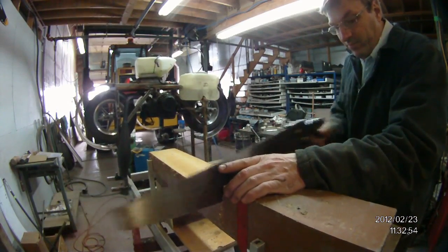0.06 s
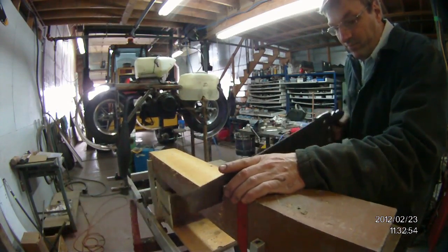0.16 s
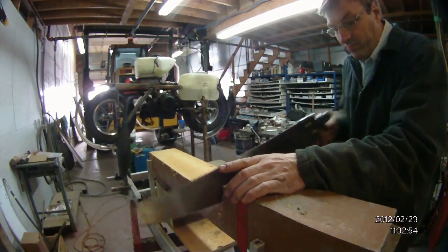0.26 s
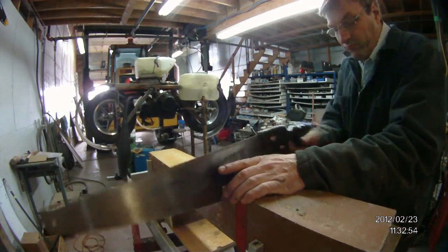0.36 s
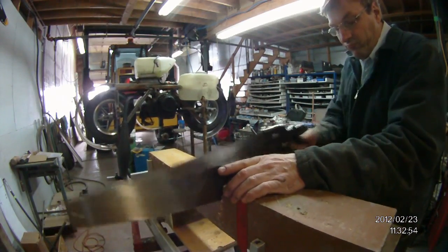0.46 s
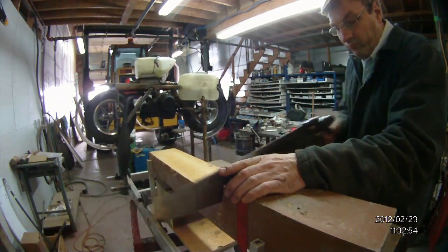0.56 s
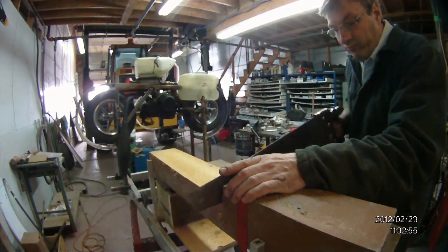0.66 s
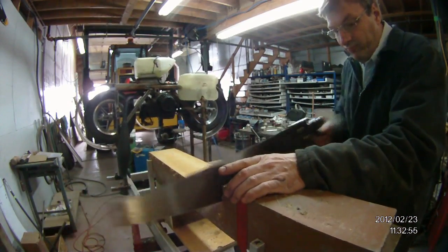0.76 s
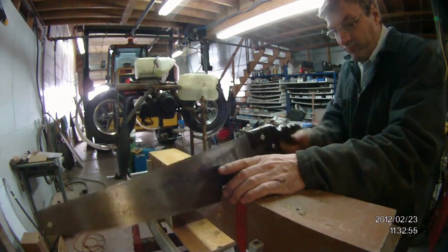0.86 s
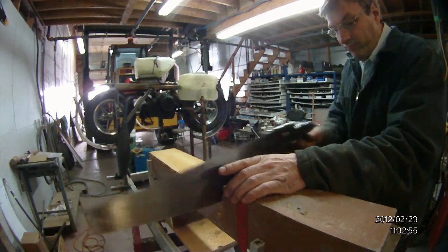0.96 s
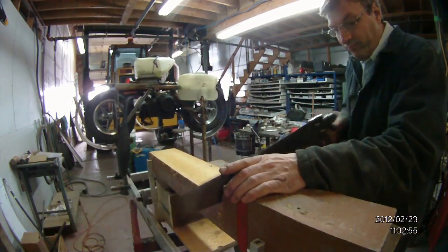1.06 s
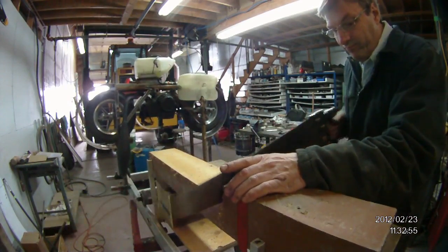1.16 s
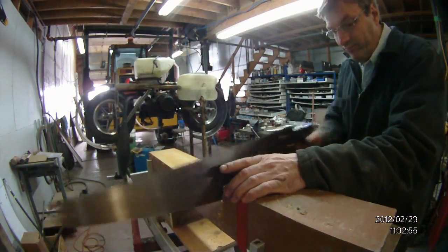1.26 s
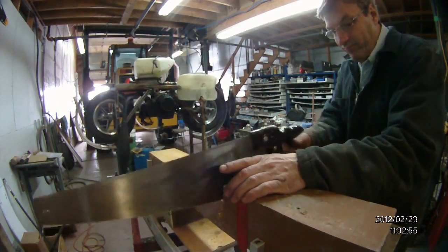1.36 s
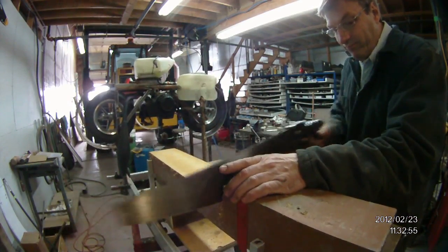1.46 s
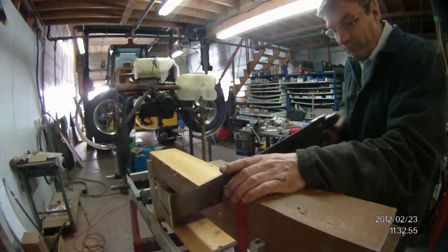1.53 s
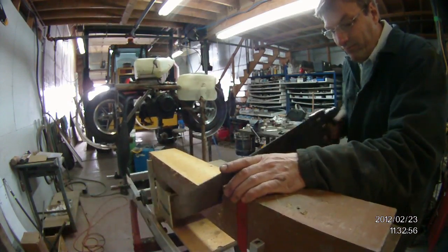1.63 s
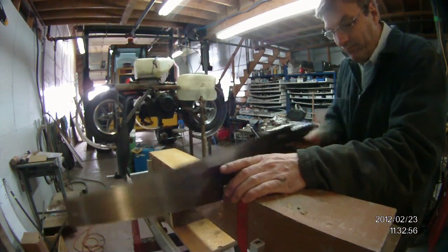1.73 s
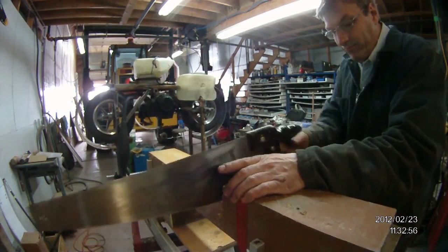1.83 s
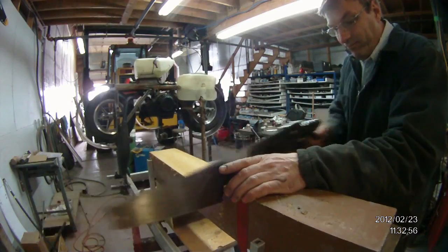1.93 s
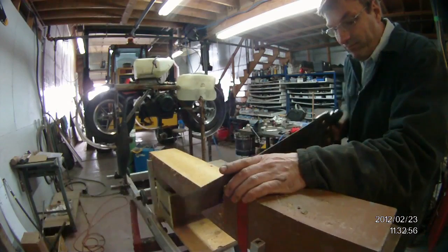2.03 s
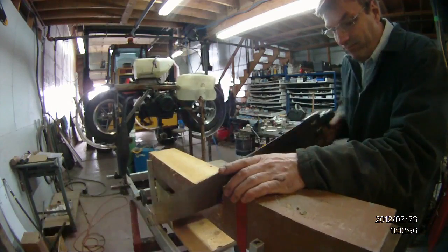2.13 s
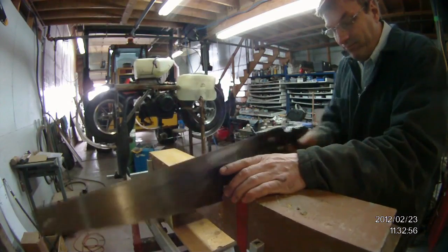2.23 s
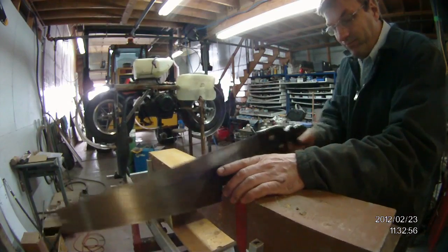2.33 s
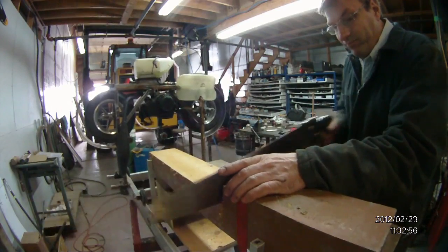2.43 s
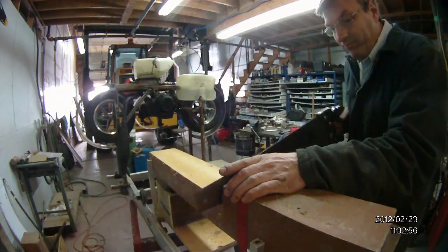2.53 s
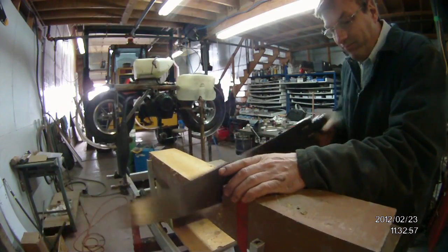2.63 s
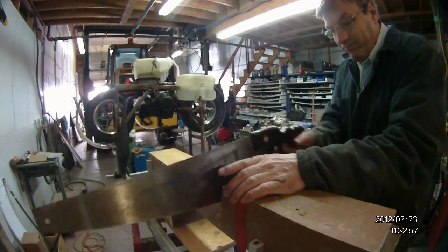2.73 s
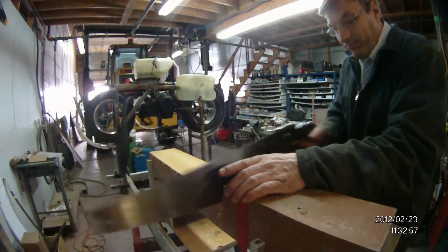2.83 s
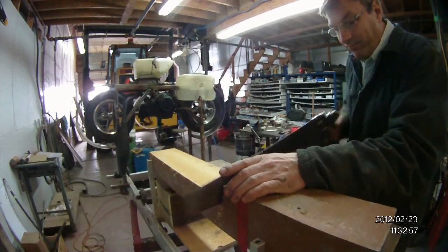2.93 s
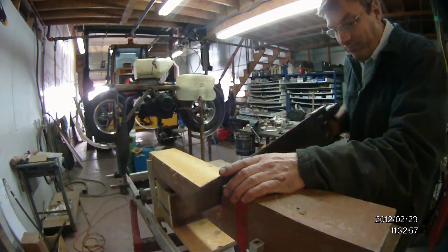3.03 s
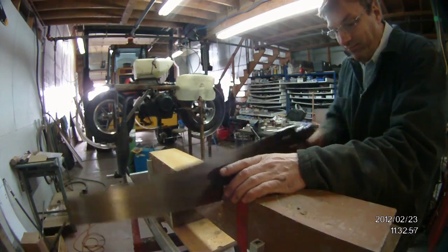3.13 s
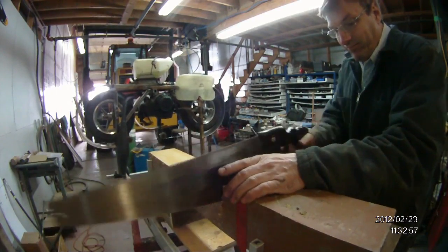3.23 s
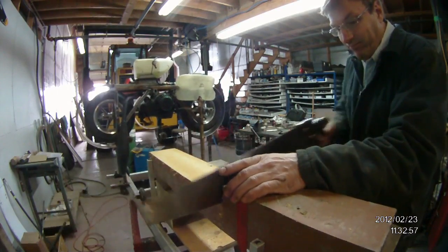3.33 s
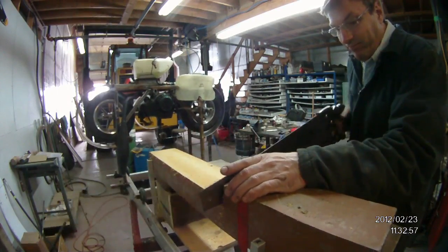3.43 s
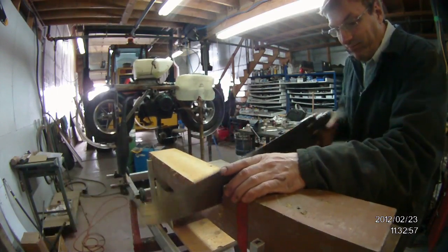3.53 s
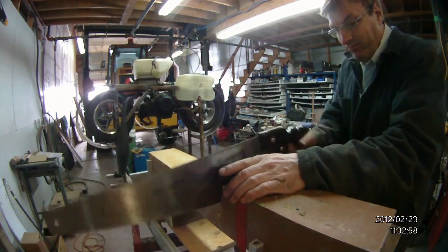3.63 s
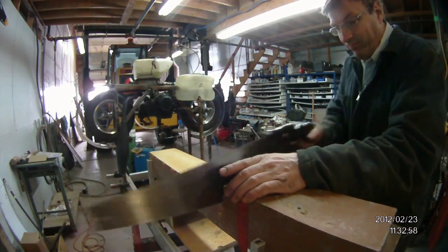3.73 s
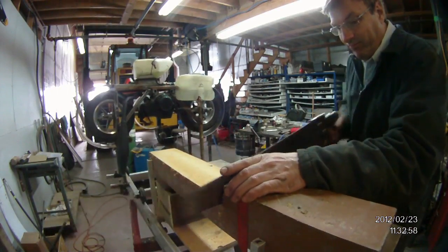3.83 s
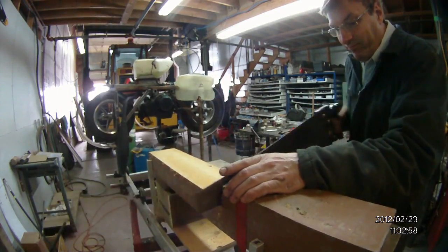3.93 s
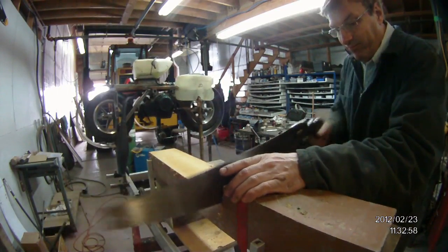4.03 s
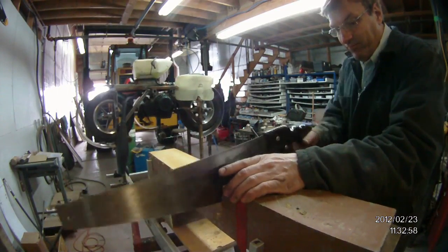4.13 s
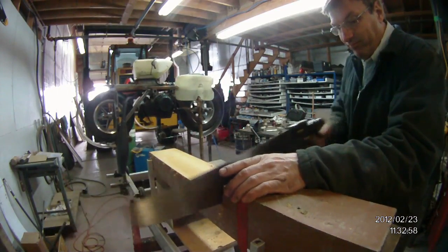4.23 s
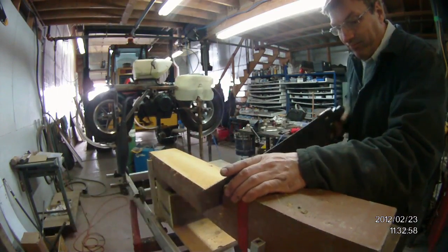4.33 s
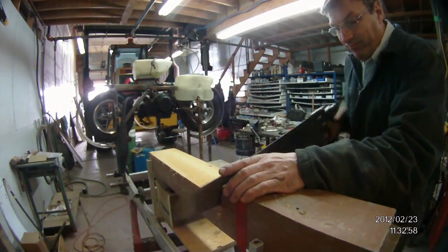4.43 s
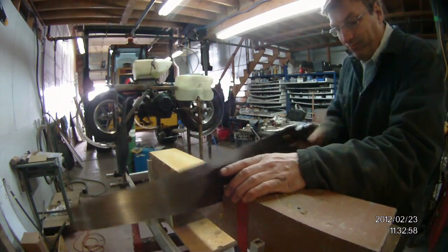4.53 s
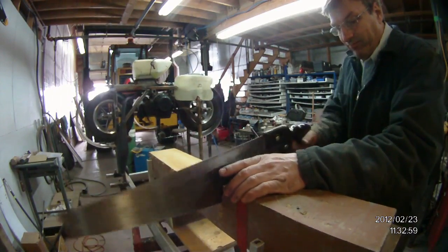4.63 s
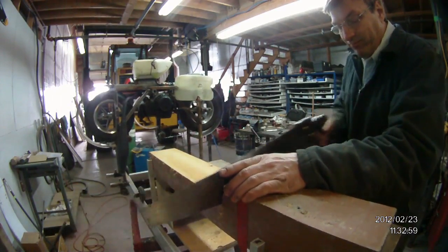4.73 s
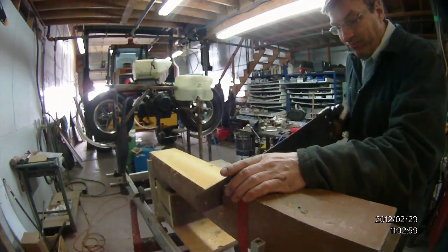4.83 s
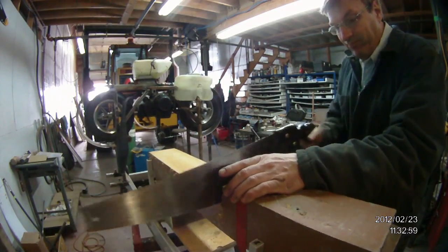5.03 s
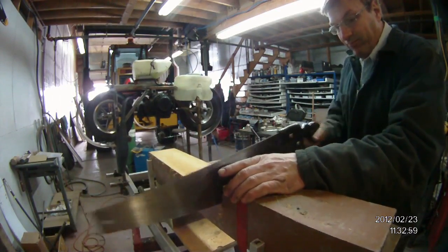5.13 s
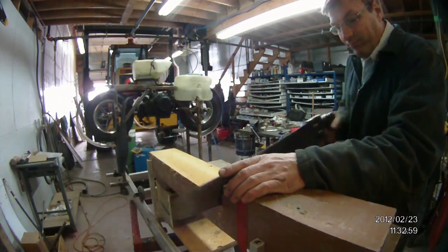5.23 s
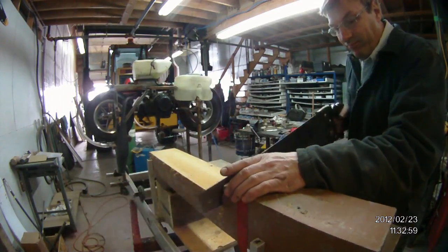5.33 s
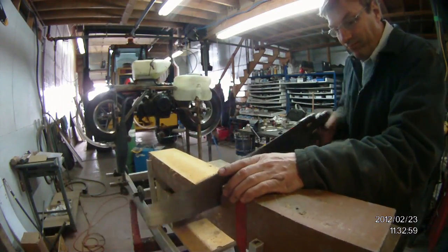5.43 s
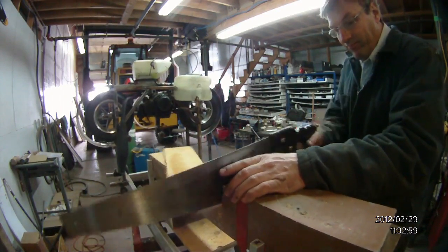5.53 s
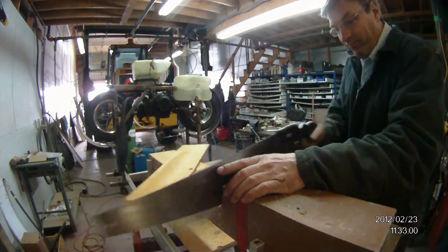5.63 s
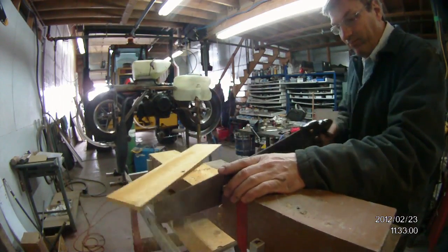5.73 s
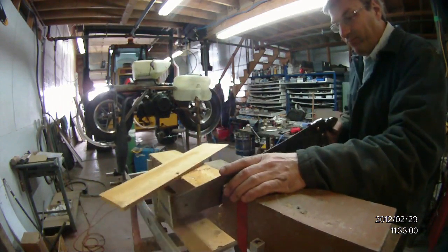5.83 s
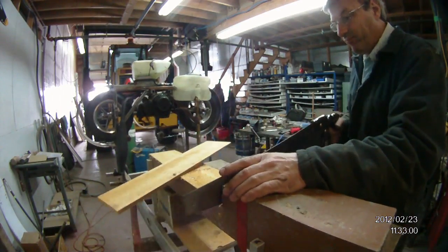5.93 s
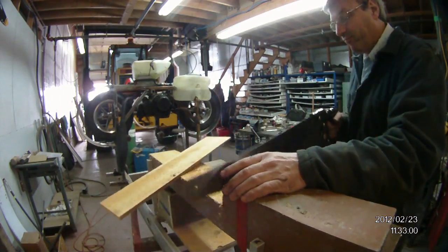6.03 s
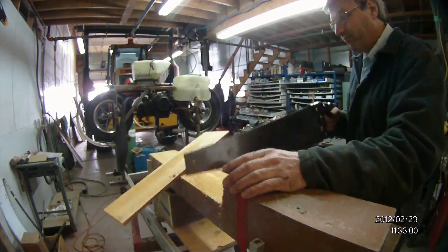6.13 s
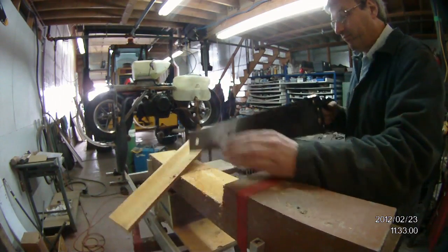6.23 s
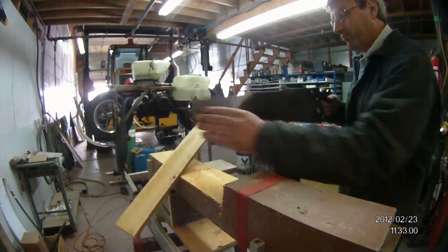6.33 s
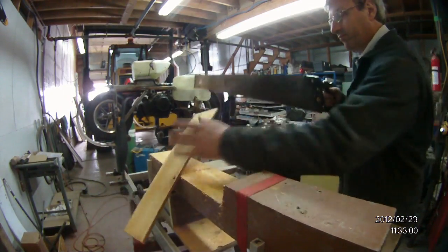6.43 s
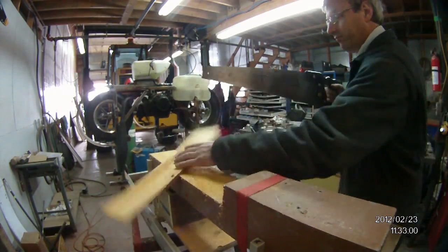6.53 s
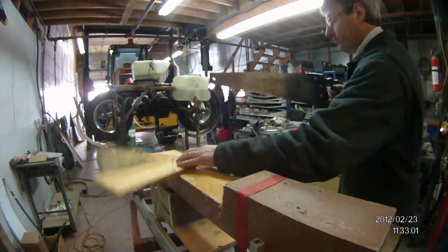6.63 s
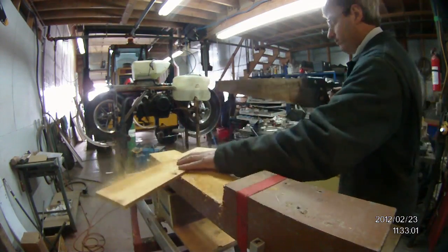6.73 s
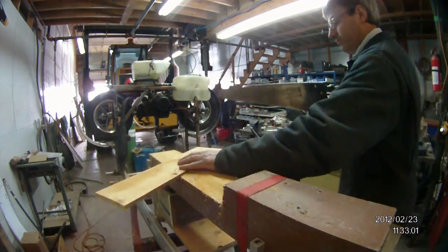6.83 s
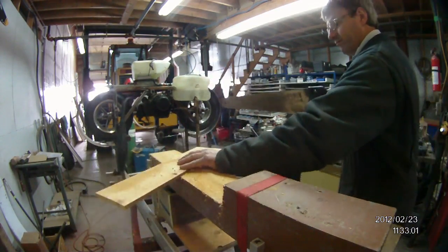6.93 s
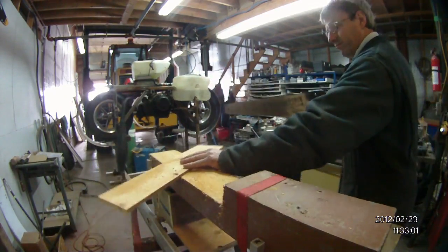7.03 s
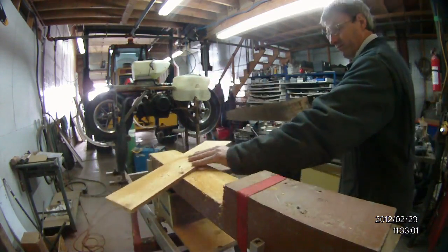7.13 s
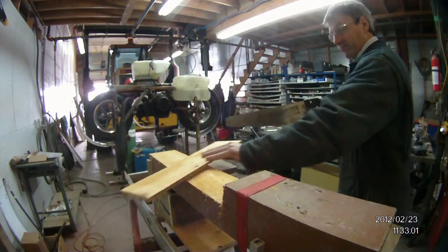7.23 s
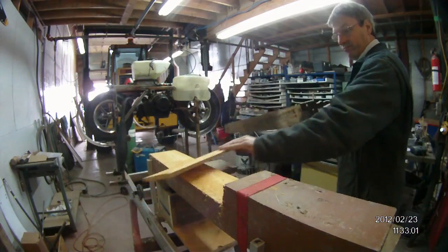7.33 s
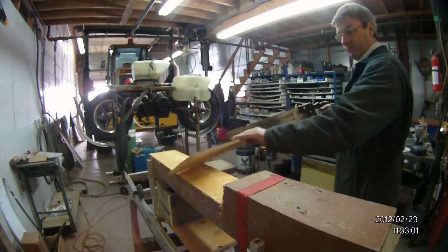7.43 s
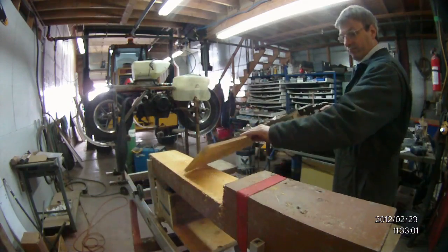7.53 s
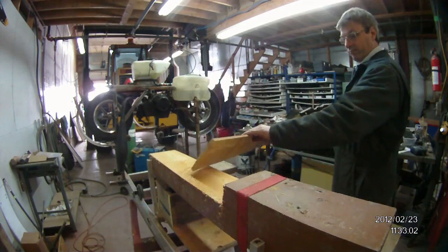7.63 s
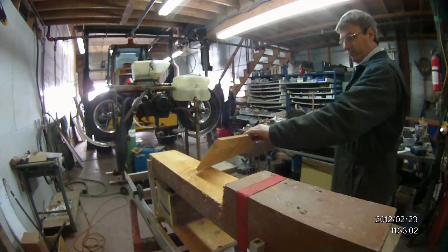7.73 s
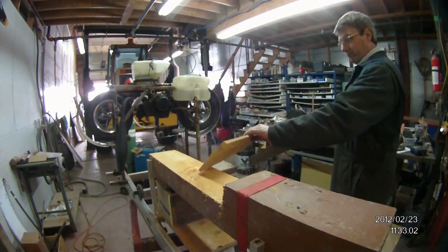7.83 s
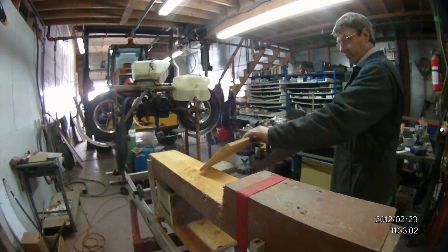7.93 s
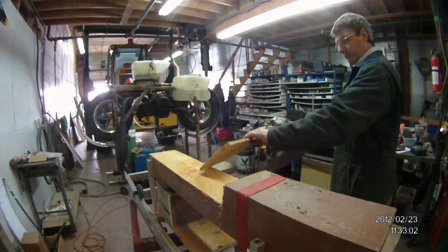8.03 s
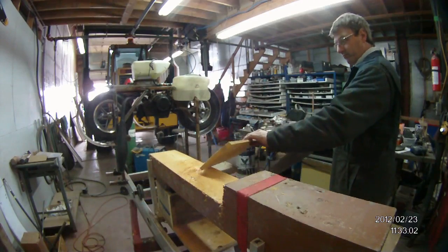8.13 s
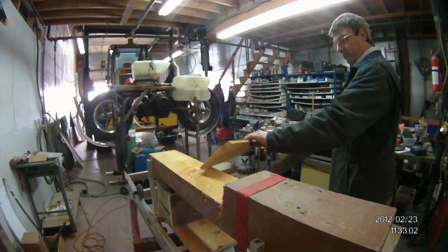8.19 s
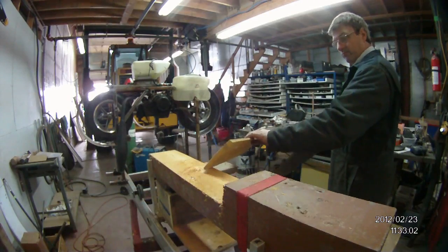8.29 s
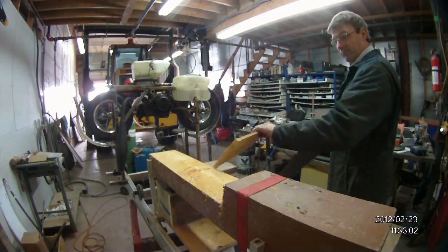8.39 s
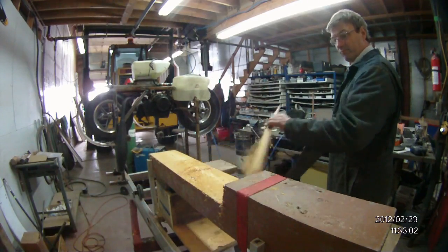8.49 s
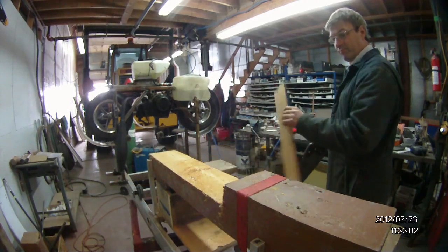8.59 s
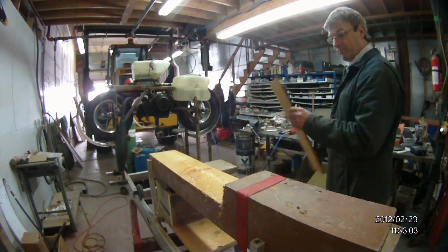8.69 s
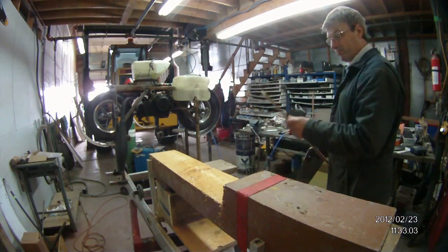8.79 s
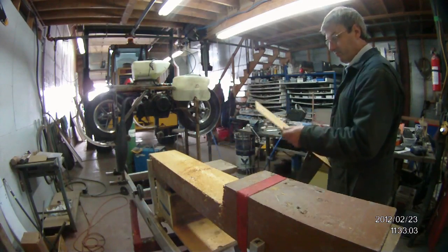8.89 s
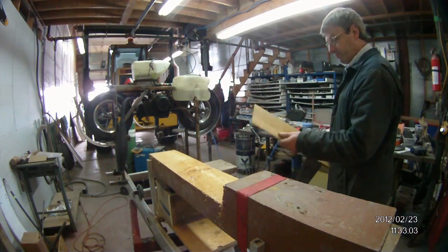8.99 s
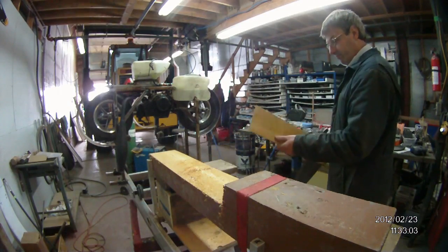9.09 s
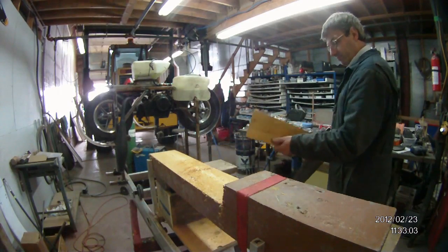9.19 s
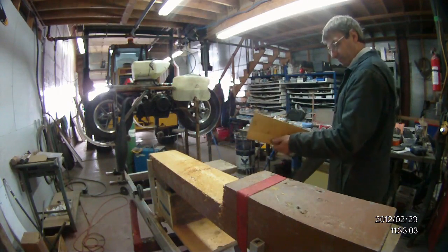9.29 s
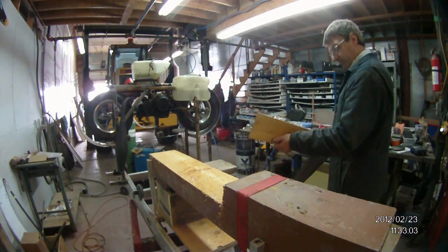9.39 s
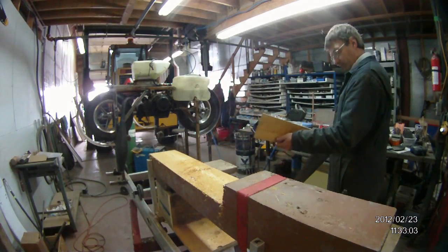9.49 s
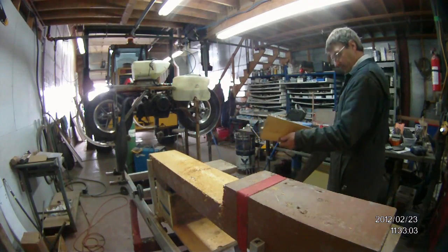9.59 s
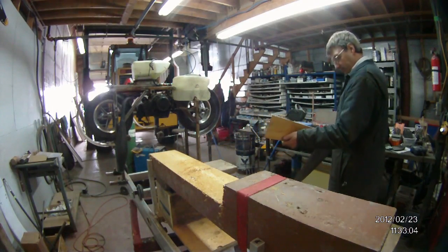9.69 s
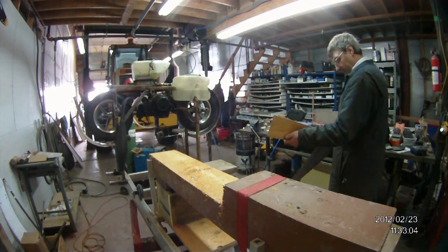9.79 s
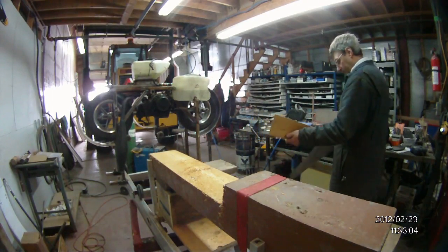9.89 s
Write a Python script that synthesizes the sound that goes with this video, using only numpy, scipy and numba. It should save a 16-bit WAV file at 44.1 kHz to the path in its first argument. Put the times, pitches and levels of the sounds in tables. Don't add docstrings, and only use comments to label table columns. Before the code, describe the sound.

A steady, gritty sawing rhythm with a hollow wood and steel resonance fills the first half, without pauses, and chirps once as the cut closes. After it stops, a few light knocks, a rub and a short swipe follow. Beneath everything a tiny geared mechanism ticks and whirs rapidly, close and dry, while the sawing carries a short dull indoor reverberation. The small microphone sounds slightly boxy.

```python
import sys
import numpy as np
from scipy import signal
from scipy.fft import rfft, irfft, next_fast_len
from scipy.io import wavfile
from scipy.ndimage import uniform_filter1d
from numba import njit

SR = 44100
rng = np.random.default_rng(int(sys.argv[2]) if len(sys.argv) > 2 else 0)


def output_pcm(signal):
    pcm = np.clip(np.atleast_2d(signal).T, -1, 1) * 32767
    wavfile.write(sys.argv[1], SR, np.round(pcm).astype(np.int16))


def volts_from_db(level):
    exponent = np.asarray(level, float) / 20
    return 10 ** exponent


N = 438794
T = np.arange(N) / SR
FAST = next_fast_len(N)
HZ = np.fft.rfftfreq(FAST, 1 / SR)
TURN_HZ, BUMP_S = 19.94, 8.035

# frequency in Hz, rms level in dB.
HUM = [(40, -106), (60, -101), (120, -92.5), (240, -89), (290, -91.5)]
# frequency in Hz, rms level in dB.
WHINE = [(360.3, -74), (1276, -75.5), (1403, -77.5), (2272, -76.5), (7838, -79.5), (7897, -88)]
# frequency in Hz, level in dB per Hz.
CLATTER_SLOPE = [(30, -40), (85, -42), (200, -20), (325, -30.5), (380, -6.5), (630, -11), (840, -9.5),
                 (1420, -4), (1890, -14.5), (2300, -11), (6000, -13), (6700, -21.5), (9500, -28),
                 (15300, -39)]
# frequency in Hz, width in Hz, level in dB.
CASING_MODES = [(357, 19, -5), (1410, 42, -8), (2340, 10, -10), (2510, 23, -14), (2720, 120, -6),
                (3980, 53, -2), (4360, 170, -1), (5240, 19, -20), (5850, 18, 6), (5770, 43, -25)]
# share of a turn, level in dB.
GEAR_TEETH = [
    (.03, -5),
    (.13, 0),
    (.52, -10.5),
    (.72, -7.5),
]
# frequency in Hz, level in dB, 60 dB decay time in seconds.
TICK_MODES = [(480, -7, .08), (640, -8, .08), (970, -8, .07), (3150, -9, .06), (3880, 2, .04),
              (4330, -14, .05), (5340, 1, .035), (5950, -4, .035)]
# peak in seconds, peak level in dB, swell and fade in dB per second.
RUBS = [
    (5.9, -71, 90, 15),
    (6.65, -68, 140, 36),
    (7.4, -63, 51, 21),
    (7.63, -79, 90, 60),
    (8.53, -62, 170, 230),
]
# frequency in Hz, level in dB per Hz.
CLOTH_SLOPE = [(200, -10), (600, -12), (1400, 12.5), (1900, -1.5), (3600, 4.5), (5000, -0.5), (8000, -29),
               (15000, -41)]
# start in seconds, peak level in dB, ring in Hz,
# 60 dB decay time in seconds, crack level in dB.
TAPS = [(1.727, -48, 1470, .04, -2), (2.159, -39, 1470, 0.064, -14), (5.463, -45, 1396, .14, 1),
        (5.525, -40, 1410, 0.11, -10), (5.736, -56, 290, 0.22, -30), (6.596, -48.5, 1340, .06, -2),
        (6.597, -60.5, 250, .07, -20), (6.604, -49, 1330, .1, -5), (6.684, -61, 1500, .05, 8.5),
        (6.713, -51, 800, .08, -10), (6.722, -48, 1300, 0.12, -20), (6.737, -53, 1090, 0.14, -12),
        (7.282, -62, 3800, .07, -6), (7.335, -62, 1417, .2, 4), (7.612, -58, 3650, .08, -6)]
# frequency in Hz, level in dB per Hz.
TEAR_SLOPE = [(120, -48.5), (280, -19), (460, -17), (820, -14.5), (980, -4.5), (1450, 0), (1740, -14),
              (2030, -10), (2930, -7), (4100, -2.5), (4750, -6.5), (5600, -15.5), (9300, -27.5),
              (15300, -59.5)]
# frequency in Hz, width in Hz, level in dB.
BLADE_MODES = [(457, 58, 19), (987, 11.3, -4), (1420, 66, 8), (2053, 33, -14), (2500, 590, -19),
               (4405, 240, -11)]
# mid-stroke frequency in Hz, width in Hz, level in dB,
# glide over a stroke as a share of the frequency.
BENDING_MODES = [(644, 21, -17, 0.17), (1000, 32, -7.5, 0.045), (1200, 28, -2, 0.16),
                 (1426, 31, -1.5, 0.029), (2045, 110, -7, 0.074), (2475, 120, -7, 0.083),
                 (3150, 120, -4, 0.043), (3930, 90, -6.5, 0.044), (4236, 160, -0.5, 0.046),
                 (4587, 99, 0.5, .03)]
# start in seconds, top tooth rate in Hz,
# lateness of top speed, tooth tone in dB, peak level in dB.
PUSH_STROKES = [(-.15, 900, 1.0, -14, -40.5), (.308, 699.5, 1.0, -15, -40), (.789, 924.8, 1.5, -15, -41.5),
                (1.249, 1015, 1.3, -17, -41), (1.713, 1015, 1.2, -15.5, -41),
                (2.195, 1030, 1.4, -10.5, -38.3), (2.664, 1015, 1.2, -12, -38),
                (3.117, 1045, .8, -8.5, -41.5), (3.57, 1060, 1.4, -15.5, -40.5),
                (4.034, 744, 1.2, -28, -41), (4.5, 940, 1.5, -7, -38.5), (4.983, 748.6, 1.4, -12, -41.5),
                (5.448, 783.6, 1.1, -10.5, -42.5), (6.02, 450, 1.0, -7, -60)]
# start in seconds, top tooth rate in Hz,
# lateness of top speed, tooth tone in dB, peak level in dB.
PULL_STROKES = [(.084, 770, 1.3, -18, -46), (.561, 715, 1.0, -17, -46.5), (1.025, 761, 1.0, -13, -47),
                (1.483, 795, 1.2, -8, -46), (1.96, 810.9, .7, -13, -45), (2.42, 714.8, .9, -22, -45),
                (2.897, 611.8, .9, -19, -45.5), (3.346, 627.5, 1.2, -18, -46.5),
                (3.804, 604.3, 1.0, -17, -46), (4.278, 569, 1.0, -14.5, -46.5),
                (4.751, 758.6, 1.2, -9, -45), (5.238, 500, 1.3, -30, -47.5), (5.705, 450, .4, -28, -46.5)]
PUSH_FORCE = [(0, 0.1), (.1, 0.2), (.2, 0.77), (.32, 0.92), (.55, 1.01), (.72, 0.9), (.85, 0.44), (1, 0)]
PULL_FORCE = [(0, .18), (.1, 0.9), (.22, 0.96), (.45, 1), (.65, 1), (.8, 0.6), (.9, 0.21), (1, .02)]
# middle in seconds, half length in seconds, change in dB.
SLACK_MOMENTS = [(0.113, 0.036, -2), (0.52, 0.03, -6), (0.582, 0.029, -2.5), (1.755, .025, -2.5),
                 (4.24, 0.037, -3), (4.7, 0.037, -3.5), (4.823, 0.018, -3), (4.927, 0.026, -2),
                 (5.18, 0.027, -3), (5.257, 0.042, -5), (5.444, 0.016, -7), (5.495, .025, -4.5)]


def unit(x):
    return x / np.sqrt(np.mean(x ** 2))


def decay(t, t60):
    return np.exp(-np.log(1000) * t / t60)


def bell(x, middle, half_width):
    return np.exp(-((x - middle) / half_width) ** 2)


def colour(x, points, peaks=(), lift_db=0.):
    size = 2 ** 14
    grid = np.fft.rfftfreq(size, 1 / SR)
    hz, db = np.transpose(points)
    gain_db = np.interp(np.log(grid + 1), np.log(hz), db)
    for f, width, peak_db in peaks:
        gain_db = gain_db + (lift_db + 0.044 * peak_db) / (1 + ((grid - f) / (width / 2)) ** 2)
    cepstrum = irfft(gain_db * np.log(10) / 20, size)
    cepstrum[1:size // 2] *= 2
    cepstrum[size // 2 + 1:] = 0
    response = irfft(np.exp(rfft(cepstrum)), size)[:size // 4]
    return signal.oaconvolve(x, response)[:N]


def band(x, lo_hz, hi_hz):
    return signal.sosfiltfilt(signal.butter(2, [lo_hz, hi_hz], "band", fs=SR, output="sos"), x)


def walk(rate):
    hold = int(SR / rate)
    levels = np.repeat(rng.standard_normal(N // hold + 1), hold)
    return 1.21 * uniform_filter1d(levels, hold)[:N]


def grit(spread_db):
    return unit(rng.standard_normal(N) * volts_from_db(spread_db * rng.exponential(size=N)))


def tones():
    lines = list(HUM) + list(WHINE)
    starts = rng.random(len(lines))
    out = np.zeros(N)
    for (hz, db), start in zip(lines, starts):
        out += volts_from_db(db + 2.5 + 0.6 * walk(3.8)) * np.sin(2 * np.pi * (hz * T + start))
    return out


def motor(memory=0.895, fresh_db=-11.5, motor_db=-62.5):
    turn = ((T - BUMP_S) * TURN_HZ) % 1
    echo = 1 / (1 - memory * np.exp(-2j * np.pi * HZ / TURN_HZ))
    repeated = unit(irfft(rfft(grit(0.96), FAST) * echo, FAST)[:N])
    clatter = repeated + volts_from_db(fresh_db) * rng.standard_normal(N)
    clatter = unit(colour(clatter, CLATTER_SLOPE, CASING_MODES, lift_db=4.0))
    bump = uniform_filter1d(np.minimum(turn / 0.063, 1) * np.exp(-turn / 0.4), 250)
    low = band(clatter, 490, 810)
    treble = band(clatter, 2150, 8100)
    air = band(clatter, 7800, 15000)
    lag = 1 + 0.19 * np.cos(2 * np.pi * (turn - .65))
    flares = low * unit(bump + 0.46) + treble * unit(bump + 0.82) + air * unit(bump + 0.46)
    return volts_from_db(motor_db) * ((clatter - low - treble - air) * lag + flares)


def gear(glide_per_s=4.9):
    turns = np.arange(-161, 39)[:, None]
    place, db = np.transpose(GEAR_TEETH)
    chance = rng.standard_normal((len(turns), len(place), 2))
    at = ((BUMP_S + (turns + place) / TURN_HZ) * SR + chance[..., 0]).astype(int)
    inside = (at >= 0) & (at < N)
    hits = np.bincount(at[inside], volts_from_db(db + chance[..., 1])[inside], N)
    t = T[:2500]
    cycles = .97 * t + glide_per_s * t ** 2 / 2
    ring = sum(volts_from_db(db) * np.sin(2 * np.pi * hz * cycles) * decay(t, t60) for hz, db, t60 in TICK_MODES)
    ring = ring * (1 - np.exp(-t / .002))
    return volts_from_db(-68.5) * unit(signal.oaconvolve(hits, ring)[:N])


def rustle():
    swells = np.zeros(N)
    for s, db, up, down in RUBS:
        swells += volts_from_db(db - np.where(T < s, up * (s - T), down * (T - s)))
    peaks = [(3620, 130, 0), (4620, 350, 0), (2280, 87, 0)]  # Hz, width Hz, dB
    return unit(colour(grit(2.1), CLOTH_SLOPE, peaks, lift_db=6.5)) * swells * volts_from_db(1.4 * walk(30))


def knocks():
    out, t = np.zeros(N), T[:6000]
    chance = rng.standard_normal((len(TAPS), len(t)))
    for (s, db, hz, t60, crack_db), noise in zip(TAPS, chance):
        ring = .5 * np.sin(2 * np.pi * hz * t)
        ring = ring + 0.4 * unit(band(noise, .5 * hz, 1.3 * hz))
        ring = ring + 0.061 * unit(band(noise, 280, 550))
        ring = ring * decay(t, t60) * np.minimum(t / 0.0012, 1)
        snap = 0.74 * np.exp(-t / 0.0023) + 0.41 * np.exp(-t / 0.014)
        crack = volts_from_db(crack_db) * unit(band(noise, 2100, 5600)) * snap * np.minimum(t / .0005, 1)
        at = int(s * SR)
        out[at:at + len(t)] += volts_from_db(db) * (ring + crack)
    return signal.sosfilt(signal.butter(4, 200, "high", fs=SR, output="sos"), out)


def squeal():
    start_s, length_s, from_hz, to_hz, song_db = 5.045, .17, 1130, 1490, -40
    groan_hz, groan_db = 450, -52
    t = T[:int(length_s * SR)]
    share = t / t[-1]
    rough = uniform_filter1d(rng.standard_normal((2, len(t))), size=300) * np.sqrt(300)
    hz = from_hz + (to_hz - from_hz) * np.sin(np.pi * share ** 1.1 * .66) + 22 * rough[0]
    song = np.sin(np.pi * share ** 1.2) * np.sin(2 * np.pi * np.cumsum(hz) / SR)
    song = volts_from_db(song_db + 2.5 * rough[1]) * song
    groan = np.sin(2 * np.pi * np.cumsum(groan_hz + 12 * rough[1]) / SR)
    groan = volts_from_db(groan_db) * bell(share, .65, 0.16) * groan
    at = int(start_s * SR)
    return np.pad(band(song + groan, 250, 2500), (at, N - at - len(t)))


@njit
def ring_out(x, hz, width):
    y, b, l = np.empty(len(x)), 0., 0.
    for i in range(len(x)):
        g, k = np.tan(np.pi * hz[i] / SR), width / hz[i]
        v = (b + g * (x[i] - l)) / (1 + g * (g + k))
        b, l, y[i] = 2 * v - b, l + 2 * g * v, k * v
    return y


def blade(drive, place):
    out = np.zeros(N)
    for hz, width, db, glide in BENDING_MODES:
        patches = volts_from_db(db + 6.4 * walk(24).clip(-3, 1.5))
        moving_hz = hz * (1 + glide * place + 0.017 * walk(11))
        out += patches * unit(ring_out(drive, moving_hz, 1. * width))
    return unit(out)


def saw():
    start, top_hz, late, tone_db, peak_db = np.transpose(sorted(PUSH_STROKES + PULL_STROKES))
    row = np.clip(np.searchsorted(start, T) - 1, 0, len(start) - 2)
    along = np.clip((T - start[row]) / np.diff(start)[row], 0, 1)
    speed = np.sin(np.pi * along ** late[row]).clip(0) ** .5
    push = row % 2 == 0
    place = np.cos(np.pi * (along + row))

    turn_db = -58
    share = along ** late[row] ** 0.1
    push_effort = np.interp(share, *np.transpose(PUSH_FORCE))
    pull_effort = np.interp(share, *np.transpose(PULL_FORCE))
    load_db = np.where(push, push_effort, pull_effort) * (peak_db[row] - turn_db)
    bite = push * bell(along, 0.14, 0.055)
    dull_db = -6 * bell(T, 5.14, 0.052)

    thrum_db = 12.5 - 0.67 * load_db + 8 * bite - 4 * speed
    dust_db = uniform_filter1d(np.where(push, 1, -1.9), size=900)
    dust_db = dust_db + 4.5 * bite + 4 * along * speed + 4 * (1 - speed) + dull_db
    rasp_db = uniform_filter1d(np.where(push, 3, 1.4), size=900)
    rasp_db = rasp_db + 3.5 * place * speed ** 2 + 2 * bite + dull_db

    teeth = 2 * np.pi * np.cumsum(top_hz[row] * speed * (1 + 0.022 * walk(200))) / SR
    partials = [(.5, -6.0), (1, 1), (2, -1), (3, -2), (4, -9)]
    raps = sum(volts_from_db(db) * np.sin(k * teeth) for k, db in partials)
    raps = raps * speed ** 3 * volts_from_db(5.6 * walk(30).clip(-3, 1.2))
    raps = unit(colour(raps, TEAR_SLOPE, BLADE_MODES, lift_db=6.0))
    tearing = grit(0.98) * (1 + 0.36 * np.sin(teeth)) * volts_from_db(walk(70))
    cut = unit(colour(tearing, TEAR_SLOPE, BLADE_MODES, lift_db=4.0))
    cut = cut + volts_from_db(1.5 + uniform_filter1d(tone_db[row], 400)) * raps
    cut = cut + volts_from_db(-4.5) * blade(tearing, place)

    thrum = band(cut, 116, 890)
    dust = band(cut, 5560, 14700)
    rasp = band(cut, 3600, 4650)
    cut = cut + (volts_from_db(thrum_db + 3.1 * walk(15)) - 1) * thrum
    cut = cut + (volts_from_db(dust_db) - 1) * dust + (volts_from_db(rasp_db) - 1) * rasp

    level_db = turn_db + .95 + load_db + 3 * (speed - .9) + 0.7 * walk(25)
    level_db = level_db - 108 * (T - 5.725).clip(0)
    for s, half, db in SLACK_MOMENTS:
        level_db = level_db + db * bell(T, s, half)
    return cut * volts_from_db(uniform_filter1d(level_db, 300)) * (T < start[-1])


def shop(x, t60_s=0.51, tail_db=-17):
    t = T[:SR // 2]
    tail = band(rng.standard_normal(len(t)), 130, 6000) * decay(t, t60_s) * (t > .008)
    tail = tail / np.sqrt(np.sum(tail ** 2))
    return x + volts_from_db(tail_db) * signal.fftconvolve(x, tail)[:N]


def scene():
    bench = saw() + knocks() + rustle()
    close = motor() + gear() + tones()
    return (shop(bench + squeal()) + close)[None]


def roll_off(x):
    return signal.sosfilt(signal.butter(12, 15290, fs=SR, output="sos"), x)


def record(dry):
    fade_in = np.minimum(T / .004, 1)
    return roll_off(dry * fade_in)


dry = scene()
out = record(dry)
output_pcm(out)
```